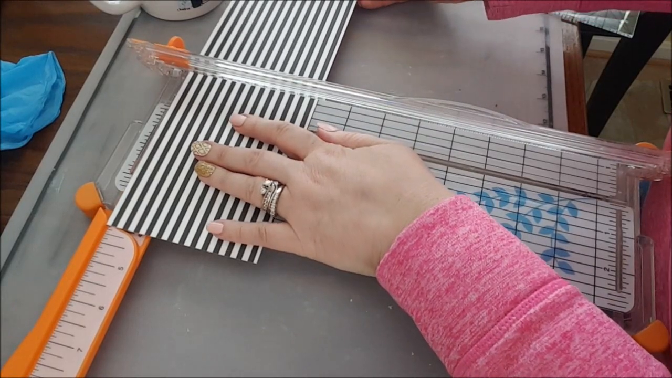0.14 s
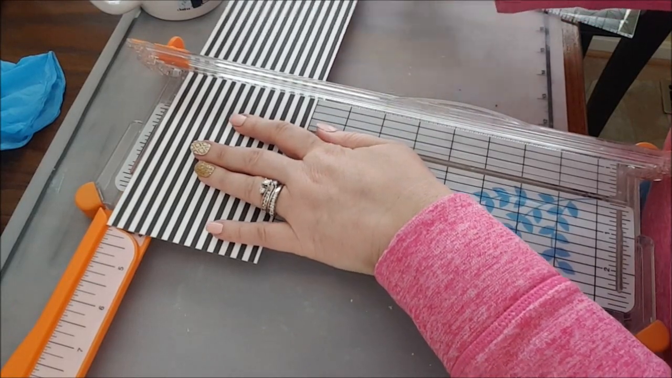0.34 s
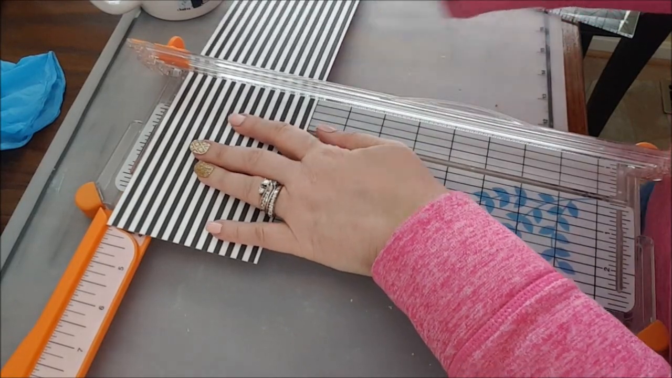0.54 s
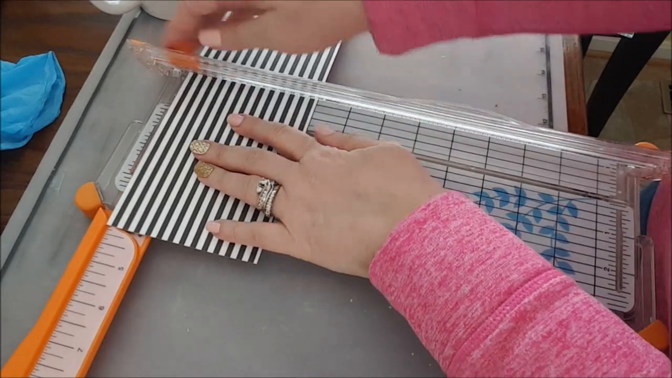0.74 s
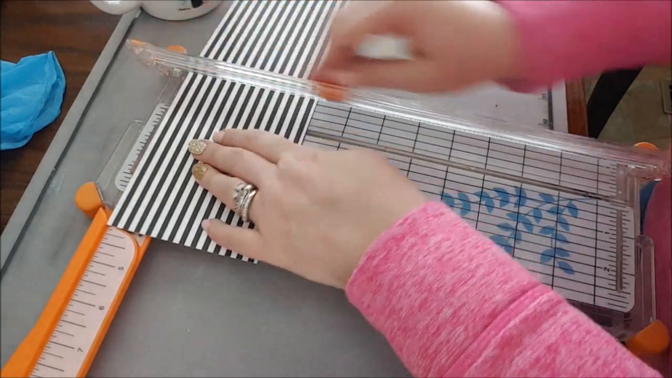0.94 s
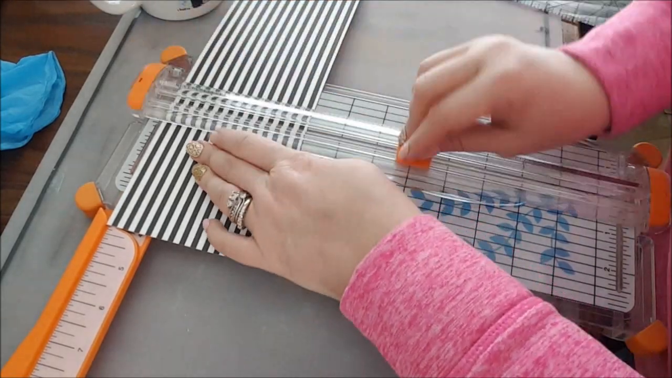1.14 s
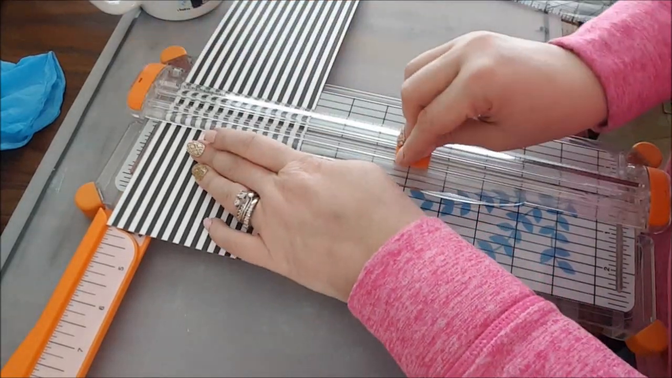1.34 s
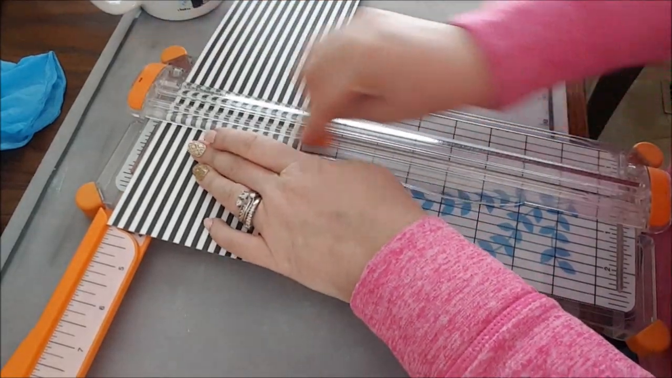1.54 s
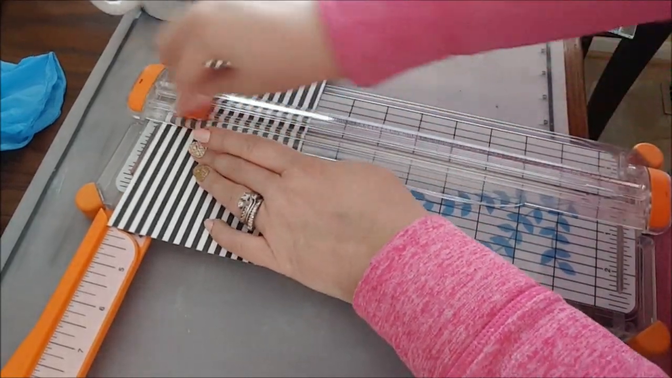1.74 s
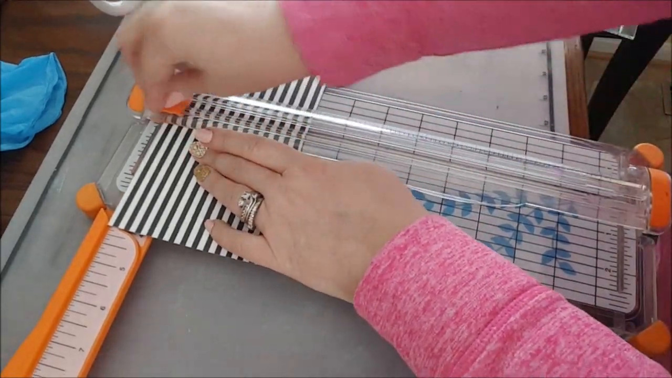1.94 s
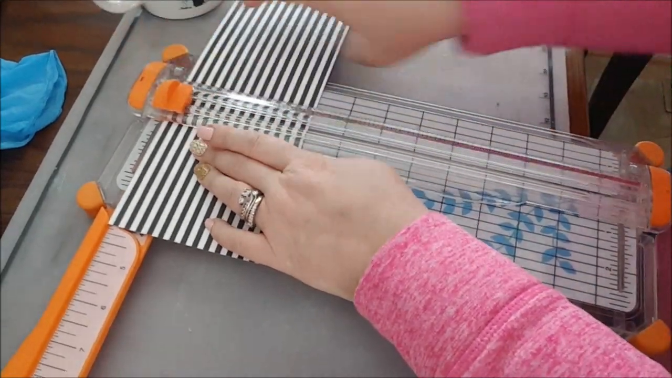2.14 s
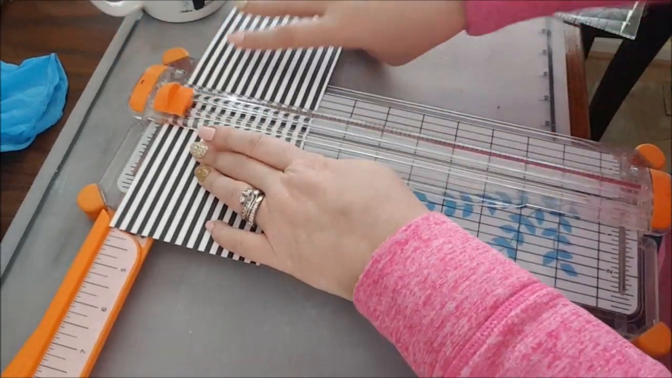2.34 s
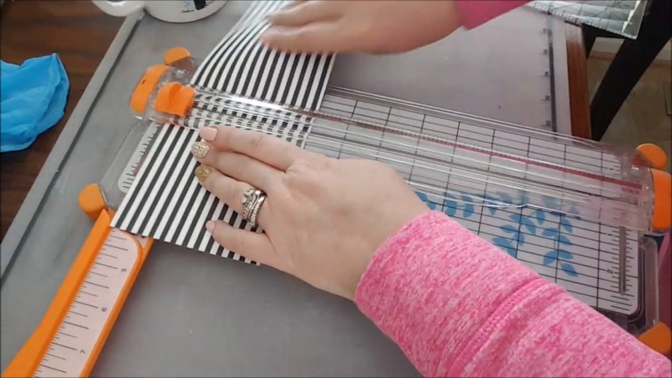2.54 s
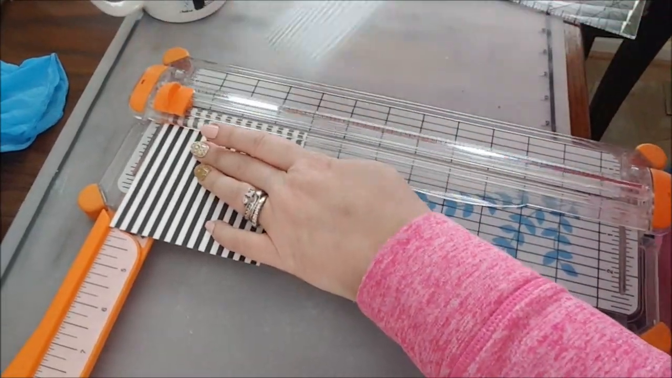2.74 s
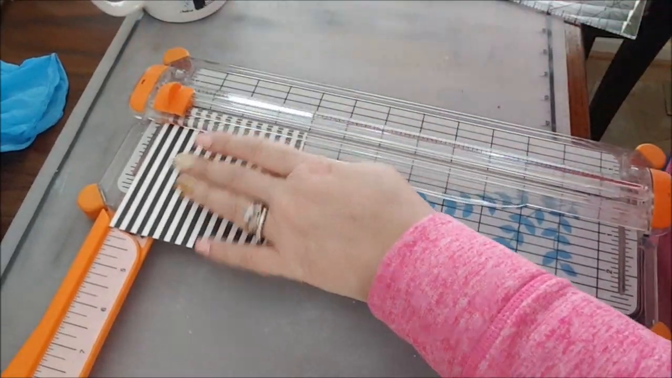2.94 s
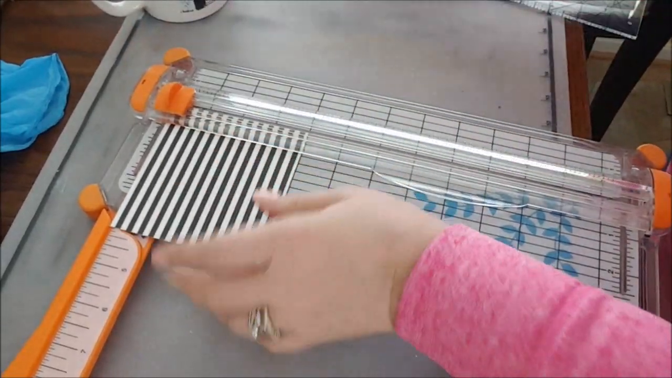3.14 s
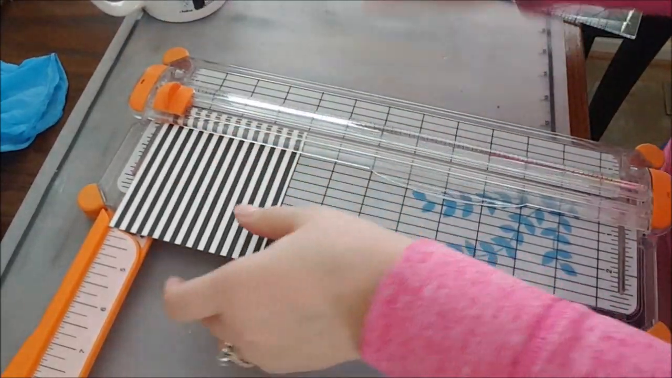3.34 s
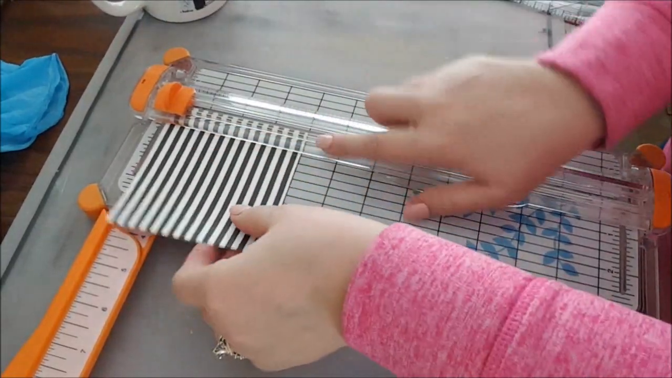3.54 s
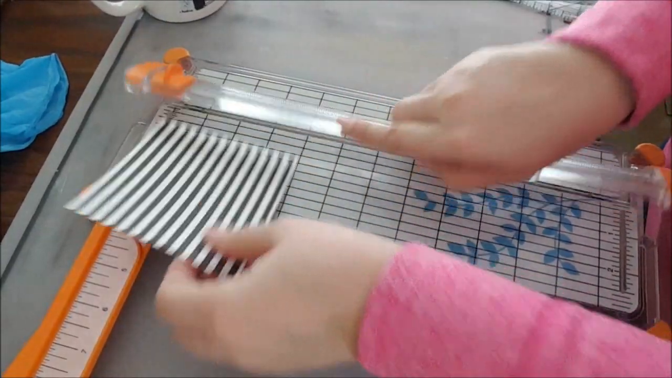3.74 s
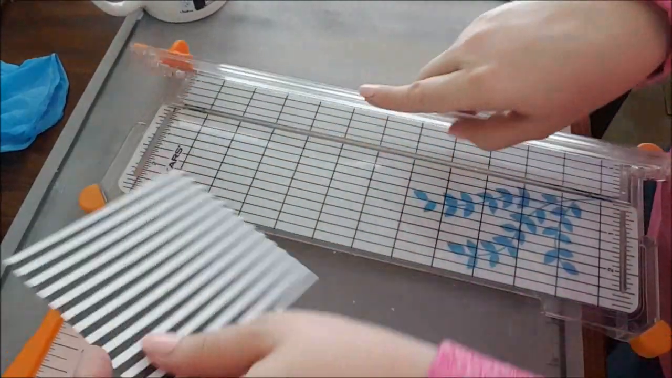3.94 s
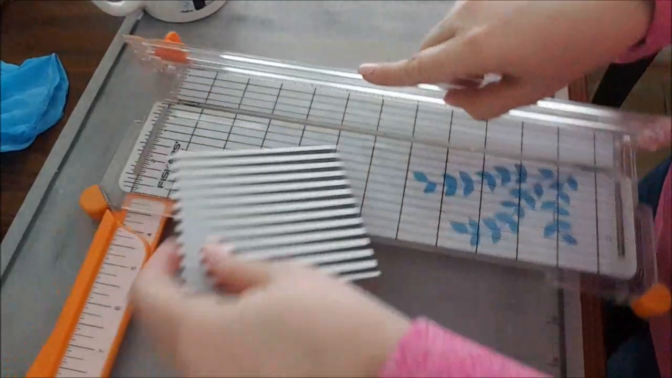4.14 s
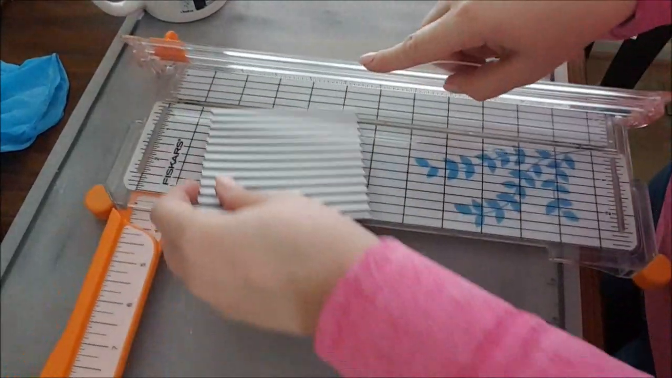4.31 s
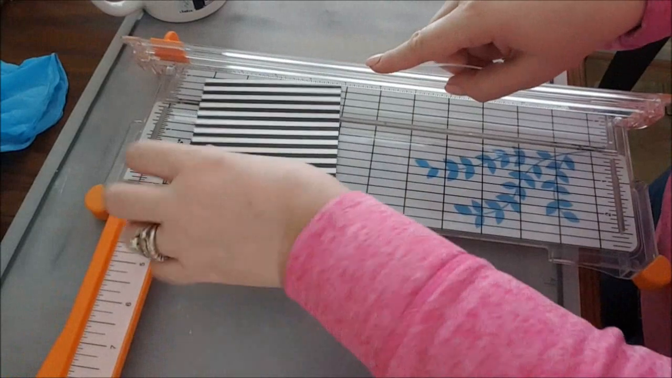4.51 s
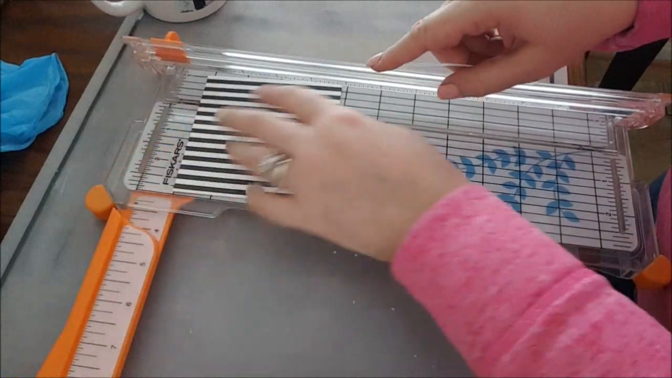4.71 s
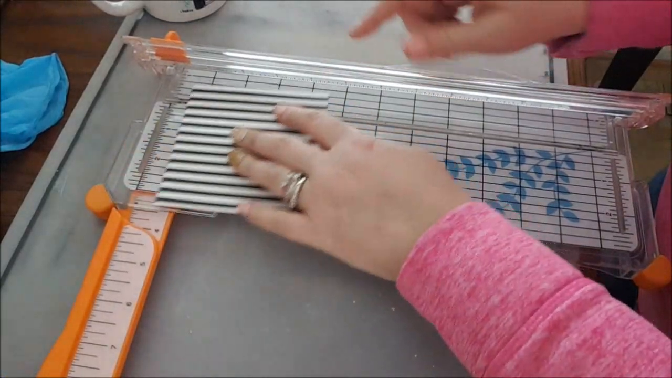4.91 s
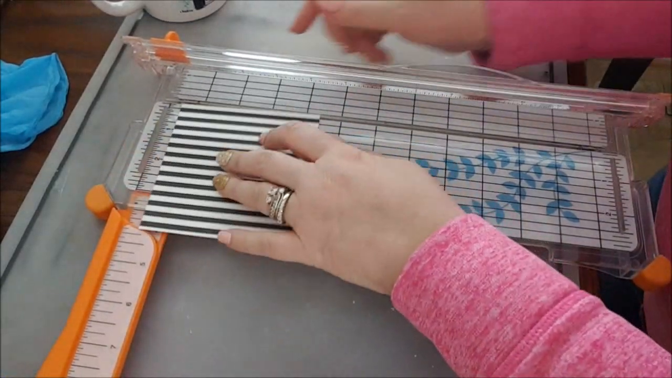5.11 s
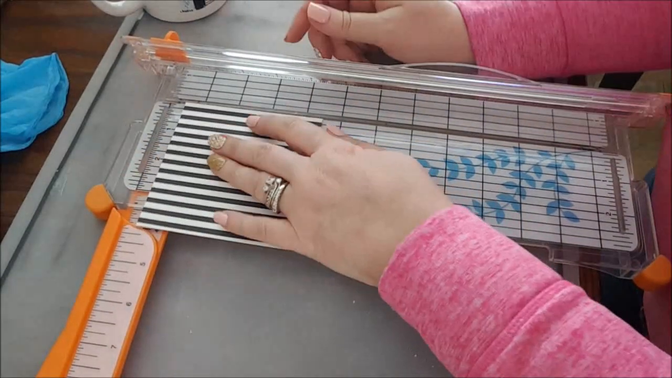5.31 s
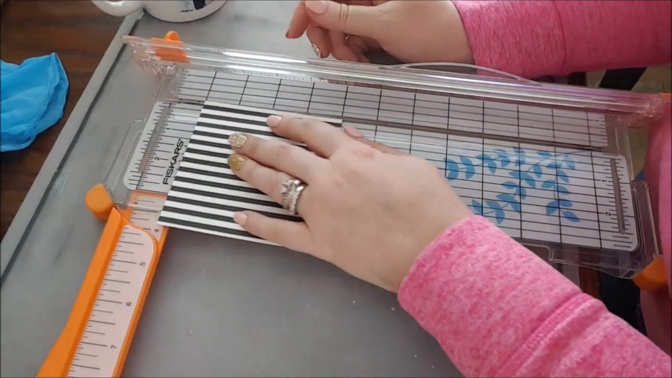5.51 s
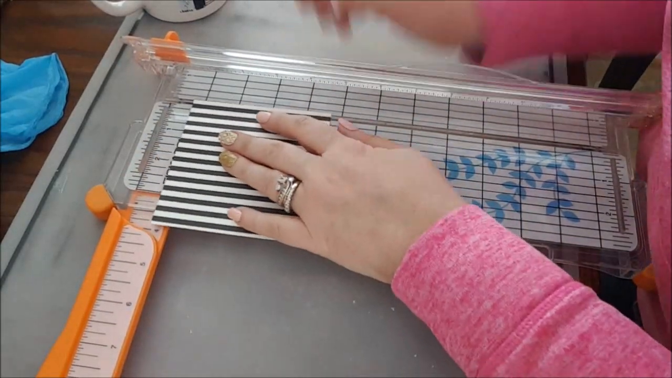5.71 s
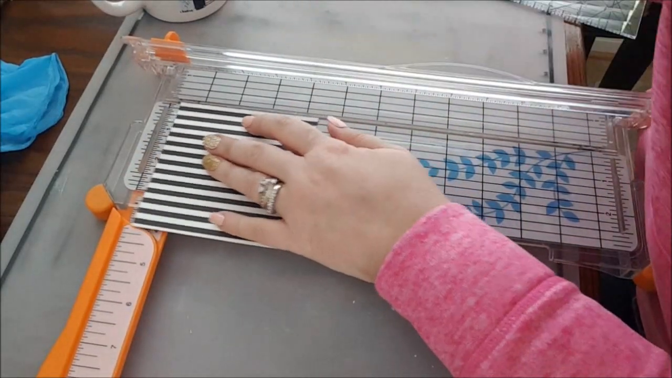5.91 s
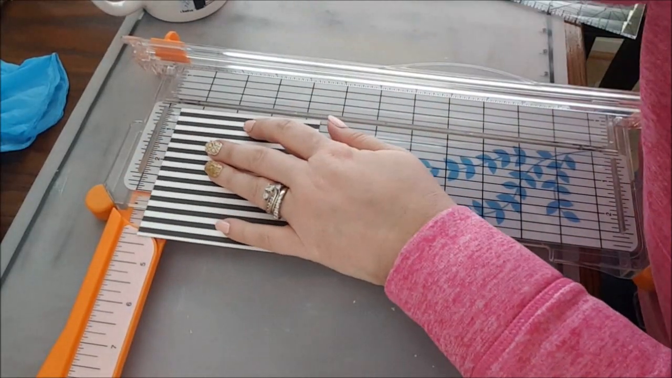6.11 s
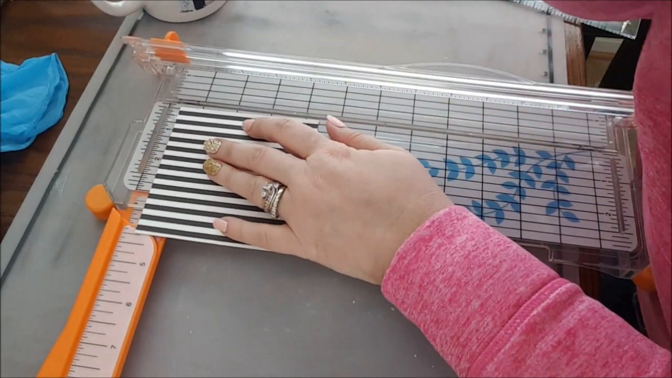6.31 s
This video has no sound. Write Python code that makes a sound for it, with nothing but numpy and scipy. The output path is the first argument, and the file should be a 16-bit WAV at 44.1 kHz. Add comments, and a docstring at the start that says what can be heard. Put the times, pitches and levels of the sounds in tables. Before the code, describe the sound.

Paper slides and rustles on a plastic trimmer, with sharp clacks, one quick blade cut and dull knocks on a table.

```python
"""In a small quiet room, hands shift paper and slide the blade of a plastic trimmer on a table.
Knocks make the hollow table and the plastic ring; rubbing paper scrapes through the same bodies.
The paper also hisses, scuffs and crinkles, and its fibres snap during one short cut.
Two spaced microphone openings hear the bass alike and the treble differently, over a low house rumble."""
import sys
import numpy as np
from scipy import signal
from scipy.fft import rfft, irfft, next_fast_len
from scipy.io import wavfile
from scipy.ndimage import uniform_filter1d

SR = 44100
rng = np.random.default_rng(int(sys.argv[2]) if len(sys.argv) > 2 else 0)


def store_pcm(level_fs):
    """Save levels as 16-bit WAV."""
    pcm = np.round(np.clip(level_fs, -1, 1) * 32767).astype(np.int16)
    wavfile.write(sys.argv[1], SR, np.atleast_2d(pcm).T)


N = 284886
ALIKE_HZ = 900  # left and right hear much the same below this

# the tones the hollow table rings with: f/Hz, level/dB, time to fade by 60 dB/s
TABLE_TONES = [(123.8, 0, 0.17), (172.7, -2, .14), (220.3, 5.5, 0.084), (260.1, -3.5, 0.11),
               (303, -5.5, 0.097)]
# the tones the plastic trimmer rings with: f/Hz, level/dB, time to fade by 60 dB/s
PLASTIC_TONES = [(362.2, -2, 0.043), (474, -4.5, 0.05), (639, -5.5, 0.051), (728, -5.5, 0.04),
                 (827, -7, 0.043), (899.6, -4, 0.052), (1005, -3.5, 0.049), (1172.4, -2, 0.032),
                 (1421, 1, 0.021), (1614, 2.5, 0.025), (2080, 5, 0.018), (3040, 1, 0.026),
                 (3770, -4.5, 0.042)]


def gain(db):
    """Turn decibels into a number to multiply a sound by."""
    return np.exp(np.asarray(db) * (np.log(10) / 20))


def unit(x):
    """Scale a sound to an average strength (rms) of 1."""
    return x / np.sqrt(np.mean(x ** 2))


def colour(x, points):
    """Shape a sound's bass and treble along (f/Hz, level/dB) points; it comes out at strength 1."""
    hz, db = np.transpose(points)
    size = next_fast_len(x.shape[-1])
    f = np.maximum(np.fft.rfftfreq(size, 1 / SR), 1)
    curve = gain(np.interp(np.log(f), np.log(hz), db, -120, -120))
    return unit(irfft(rfft(x, size) * curve, size)[:, :x.shape[-1]])


def stereo_noise(count):
    """Noise at both microphone openings: shared in the bass, slightly opposed in the treble."""
    size = next_fast_len(count)
    f = np.fft.rfftfreq(size, 1 / SR)
    alike = np.clip(1.136 / (1 + (f / ALIKE_HZ) ** 2) - .2, -1, .97)
    mid, side = rfft(rng.standard_normal((2, size)))
    mid, side = mid * np.sqrt(1 + alike), side * np.sqrt(1 - alike)
    return unit(irfft(np.array([mid + side, mid - side]), size)[:, :count])


def wander(per_second):
    """A curve that glides to a new random value this many times a second."""
    step = int(SR / per_second)
    return 1.69 * uniform_filter1d(np.repeat(rng.standard_normal(N // step + 1), step), step)[:N]


def band(x, hz, width_hz):
    """Keep the part of a sound near one pitch, at strength 1."""
    return unit(signal.lfilter(*signal.iirpeak(hz, hz / width_hz, fs=SR), x))


def house_rumble():
    """The house rumbles and hisses, wavering a little, beside a faint steady high whine."""
    # the background noise, from bass to treble: f/Hz, level/dB
    rumble_shape = [(15, -66), (25, -22.5), (55, -13), (126, -14), (179, -13.5), (200, -16.5), (299, -18.5),
                    (403, -26), (691, -25), (1090, -31.5), (1180, -31.5), (6660, -45.5), (15800, -45.5)]
    whine = band(rng.standard_normal((2, N)), hz=9700, width_hz=110)
    rumble = gain(-63.5 + 0.4 * wander(1)) * colour(stereo_noise(N), rumble_shape)
    return rumble + gain(-91) * whine


def shake_body(x, tones, damping):
    """Steady shaking makes a body hum; pressing hands (damping) blur its tones."""
    out = 0
    for hz, db, fade_s in tones:
        # as the point of contact travels, each tone comes and goes
        out = out + gain(db + 4.5 * wander(18)) * band(x, hz, damping / fade_s)
    return unit(out)


def rubbing_paper():
    """Paper sticks and slips very fast: the plastic scrapes, the sheet hisses, the table rumbles."""
    # rubs: t at full strength/s, rise/s, hold/s, fall/s, scrape level/dB,
    # hiss above the scrape/dB, rumble above the scrape/dB
    rubs = [(0.43, 0.2, 0.053, 0.069, -64, -7.5, -20), (1.096, 0.27, 0.05, 0.13, -60.5, -5.5, -10),
            (1.18, .04, 0.041, 0.38, -65.5, -1.5, -5), (1.722, 0.79, .005, 0.57, -56.5, -13, -1),
            (1.766, 0.0051, .25, 0.0033, -47, -2.5, 1.5), (2.806, 0.18, 0.028, 0.094, -48, -3.5, -19),
            (2.911, 0.29, 0.002, 0.0043, -44, 1, -24), (3.285, 0.053, .005, 0.15, -59.5, -6.5, 7.5),
            (3.361, 0.081, .005, 0.044, -51.5, -13.5, -9.5), (3.742, 0.012, .005, 0.12, -57, -4, -3),
            (3.927, 0.44, 0.059, 0.23, -67.5, -3.5, 1), (4.099, 0.3, .005, 0.097, -63, -2, -4.5),
            (4.242, 0.4, 0.078, 0.23, -67, -1.5, -20.5), (4.474, 0.021, 0.011, 0.06, -44.5, -39, -5.5),
            (4.665, 0.12, 0.038, 0.028, -65, 0, -15), (5.09, 0.16, 0.02, 0.14, -69.5, 8.5, 2.5),
            (5.278, 0.11, 0.0088, 0.068, -70.5, 1.5, -3), (6.1, 0.38, 0.029, 0.23, -73.5, -0.5, 4.5),
            (6.273, 0.37, 0.011, 0.16, -69, -6, -16.5)]
    # creases snapping in the paper: t/s, level/dB
    crinkles = [(3.365, -50), (3.462, -52), (3.6709, -49.5), (3.7024, -52), (3.7456, -65), (3.9055, -56),
                (4.463, -69), (4.4835, -50.5), (4.999, -54), (5.268, -56.5), (5.5031, -59)]
    # the scrape, from bass to treble: f/Hz, level/dB
    scrape_shape = [(200, -28), (400, -23.5), (1000, -8), (1180, -7), (1370, -9), (2100, -10), (2700, -9.5),
                    (3120, -11.5), (3600, -12), (6500, -38.5)]
    # the paper's bright hiss: f/Hz, level/dB
    hiss_shape = [(2200, -29.5), (3400, -1.5), (4500, -7.5), (6300, -5), (7400, -7.5), (8400, -1),
                  (9500, -9), (10600, -13), (12000, -15.5), (15900, -17.5)]
    swell_db, crinkle_s = 25, 0.0013  # a rub climbs by swell_db in its rise and sinks as far in its fall
    t = np.arange(N) / SR
    power = np.zeros((3, N))
    for start, rise, hold, fall, scrape_db, hiss_db, rumble_db in rubs:
        from_peak = np.maximum((start - t) / rise, (t - start - hold) / fall).clip(min=0)
        levels_db = scrape_db + np.array([[0], [hiss_db], [rumble_db]])
        power += gain(levels_db - swell_db * from_peak) ** 2
    scrape_gain, hiss_gain, rumble_gain = np.sqrt(power)
    for start, db in crinkles:  # the hiss jumps and dies at once
        hiss_gain += gain(db) * np.exp(-np.maximum(t - start, 0) / crinkle_s) * (t >= start)
    slips = gain(2.0 * wander(400) + .8 * wander(50))
    friction = stereo_noise(N) * slips
    scrape = unit(colour(friction, scrape_shape) + .6 * shake_body(friction, PLASTIC_TONES, damping=2.5))
    hiss = colour(stereo_noise(N) * slips, hiss_shape)
    rumble = shake_body(friction, TABLE_TONES, damping=9.7)
    return scrape_gain * scrape + hiss_gain * hiss + rumble_gain * rumble


def strike_body(tones, chance, t, centre_hz, drop_db_per_octave, scatter_db=2):
    """One blow rings a body; where it lands favours the tones near centre_hz."""
    hz, db, fade_s = np.transpose(tones)[:, :, None]
    share, detune, skew = chance[:, :len(tones), None]  # no two blows are alike
    db = db + scatter_db * share - drop_db_per_octave * np.abs(np.log2(hz / centre_hz))
    fading = gain(db - 60 * t / fade_s) / np.linalg.norm(gain(db))
    phase = 2 * np.pi * hz * (1 + 0.011 * detune) * t
    apart = (.5 + .2 * skew) * hz / ALIKE_HZ  # higher tones reach left and right more out of step
    return np.array([(fading * np.sin(phase + shift)).sum(0) for shift in (apart, -apart)])


def knocks():
    """Each knock gives a sharp tick and sets the plastic clacking and the table thudding."""
    # knocks: t/s, clack level/dB, clack f/Hz, thud level/dB, thud f/Hz, tick level/dB, tick f/Hz
    blows = [(0.586, -48, 1060, -65, 166, -60, 2410), (0.919, -28, 1450, -37.5, 264, -33.5, 4895),
             (0.94, -32, 1540, -39.5, 316, -51, 2400), (1.269, -44, 1399, -62, 200, -66, 2380),
             (1.3005, -7.5, 915, -12.5, 240, -6.5, 4106), (1.31, -11, 650, -44, 230, -12.5, 4170),
             (1.323, -12, 970, -40, 242, -11, 4850), (1.704, -31.5, 1130, -65, 250, -45, 2720),
             (1.767, -34.5, 750, -36, 233, -44, 3090), (2.017, -21, 1060, -23.5, 260, -21.5, 3720),
             (2.126, -40, 352, -35.5, 216.6, -71, 2450), (2.198, -38.5, 930, -73.5, 198, -77.5, 2400),
             (2.368, -27, 358, -36.5, 349, -45.5, 2330), (2.529, -66.5, 355, -44.5, 190, -79, 2400),
             (2.663, -46.5, 960, -52.5, 249, -60.5, 2400), (2.696, -32.5, 1110, -42.5, 129.5, -39, 2670),
             (2.916, -14, 920, -25, 235, -18, 3680), (2.934, -14, 960, -28, 226, -17, 1665),
             (3.281, -40.5, 904, -56.5, 269, -45, 4200), (3.297, -35.5, 863, -64, 273, -49, 2400),
             (3.335, -34, 443, -43, 232, -44.5, 2620), (3.347, -28, 847, -49.5, 326, -35.5, 2210),
             (3.403, -64.5, 925, -44.5, 118.3, -49, 2385), (3.656, -34, 354, -38, 347, -48, 2400),
             (3.669, -31.5, 1030, -45.5, 195, -48, 2400), (3.7, -38, 900, -62.5, 245, -47.5, 2400),
             (3.725, -30, 1003, -34, 187, -50.5, 2405), (3.852, -45.5, 1040, -43, 222, -52.5, 2400),
             (4.234, -42, 1540, -59.5, 215, -51.5, 3670), (4.324, -23.5, 470, -20.5, 220, -50, 3640),
             (4.36, -43, 1170, -32.5, 213, -49, 1950), (4.456, -24, 350, -9.5, 188, -41.5, 1170),
             (4.475, -32.5, 1160, -25.5, 154, -42.5, 1185), (4.485, -42, 1410, -24.5, 306, -45.5, 1980),
             (4.523, -32, 494, -21.5, 146, -47.5, 1874), (5.001, -49, 1040, -52, 261, -57, 2406),
             (5.361, -41, 1000, -50.5, 156, -48.5, 3600), (5.393, -48, 1007, -66, 153.6, -57.5, 3620),
             (5.42, -55, 1010, -45, 257, -61.5, 3600), (5.503, -51, 864, -43, 115.4, -58, 2400)]
    # the crack of noise on contact, from low to high: f/Hz, level/dB
    crack_shape = [(900, -35.5), (1700, 6.5), (9000, -1.5), (11000, -9), (16000, -12.5)]
    contact_s, thud_rise_s, clack_rise_cycles = 0.0031, .007, 1.4
    ping_db, ping_fade_s = -5, .035
    out, size, crack_size = np.zeros((2, N + SR)), 8192, 2048
    t = np.arange(size) / SR
    f = np.fft.rfftfreq(crack_size, 1 / SR) + 1
    push = np.exp(-t[:crack_size] / contact_s) * (1 - np.exp(-t[:crack_size] / (0.31 * contact_s)))
    thud_rise = np.sin(np.minimum(t / thud_rise_s, 1) * np.pi / 2) ** 2  # the table swings up slowly
    for start, clack_db, clack_hz, thud_db, thud_hz, tick_db, tick_hz in blows:
        chance = rng.standard_normal((2, 3, 16))
        clack = strike_body(PLASTIC_TONES, chance[0], t, clack_hz, drop_db_per_octave=13)
        clack *= np.minimum(t * clack_hz / clack_rise_cycles, 1)  # duller clacks come from softer contact
        thud = strike_body(TABLE_TONES, chance[1], t, thud_hz, drop_db_per_octave=8.5)
        thud *= thud_rise * np.linspace(1, 0, size)
        blow = gain(clack_db) * clack + gain(thud_db) * thud
        # the tick is a broad crack plus a ping from the small part that is struck
        near_tick = gain(-5 * np.abs(np.log2(f / tick_hz)))
        crack = irfft(rfft(colour(stereo_noise(crack_size), crack_shape)) * near_tick)
        blow[:, :crack_size] += gain(tick_db) * unit(crack) * push
        ping = strike_body([(tick_hz, 0, ping_fade_s)], chance[1], t, tick_hz, drop_db_per_octave=0)
        blow += gain(tick_db + ping_db) * ping * np.minimum(t / .001, 1)
        i = int(start * SR)
        out[:, i:i + size] += blow
    return out[:, :N]


def paper_scuffs():
    """A paper edge scuffs: a puff of noise with a pitch of its own that soon dies."""
    # scuffs: t/s, level/dB, f/Hz, dying time/ms
    scuffs = [(1.171, -50.5, 3440, 24), (2.79, -43.5, 4930, 60), (2.855, -42.5, 1790, 34),
              (2.877, -37.5, 1178, 31), (2.885, -37, 3050, 25), (3.95, -61.5, 10460, 10),
              (4.649, -55, 3150, 35), (6.16, -71, 14540, 11.6), (6.249, -65, 13950, 22),
              (6.361, -70.5, 13400, 23)]
    out, size = np.zeros((2, N + SR)), 8192
    t_ms = 1000 * np.arange(size) / SR
    for start, db, hz, dying_ms in scuffs:
        peak_shape = [(hz / 2, -36), (hz / 1.08, -11), (hz, 0), (hz * 0.96, -11), (hz * 2, -36)]
        puff = colour(stereo_noise(size), peak_shape)
        rise_and_fall = np.minimum(3 * t_ms / dying_ms, 1) * np.exp(-t_ms / dying_ms)
        i = int(start * SR)
        out[:, i:i + size] += gain(db) * puff * rise_and_fall
    return out[:, :N]


def blade_cut():
    """Fibres part in quick uneven snaps while the blade runs through the sheet."""
    # the pitches at which the blade sings in the paper: f/Hz, width/Hz, level/dB
    blade_bands = [(205, 47, 0.5), (720, 110, 7.5), (997, 70, 9), (1364, 82, 7.5), (2080, 94, -19),
                   (3050, 110, 5), (3440, 140, -13), (5170, 440, -5), (8600, 1600, -4)]
    start_s, length_s, level_db = 1.766, 0.248, -45
    out, size = np.zeros((2, N)), SR // 2
    t = np.arange(size) / SR
    snaps = stereo_noise(size) * gain(2.6 * wander(700)[:size] + .8 * wander(90)[:size])
    singing = sum(gain(db + 1.6 * wander(35)[:size]) * band(snaps, hz, width_hz)
                  for hz, width_hz, db in blade_bands)
    on_off = np.clip(np.minimum(t, length_s - t) / .003, 0, 1)
    i = int(start_s * SR)
    out[:, i:i + size] = gain(level_db) * unit(singing) * on_off
    return out


def room_echo(x):
    """The room smears each sound into a short echo whose low and high parts die at their own pace."""
    # the parts of the echo: f/Hz, time to fade by 60 dB/s, level/dB
    echo_bands = [(146.9, 0.34, -1), (503, 0.44, -5), (1540, 0.42, -5.5), (3750, 0.41, -7.5),
                  (9420, 0.3, -5.5)]
    size = SR // 2
    t, f = np.arange(size) / SR, np.fft.rfftfreq(size, 1 / SR)
    noise, tail = rfft(stereo_noise(size)), 0
    band_number = np.interp(np.log(f + 1), np.log([row[0] for row in echo_bands]), range(len(echo_bands)))
    for k, (_, fade_s, db) in enumerate(echo_bands):
        part = irfft(noise * np.clip(1 - abs(band_number - k), 0, 1), size)
        fade = gain(-60 * t / fade_s) * np.clip((t - .002) / .005, 0, 1)
        tail = tail + gain(db) * part * fade / np.linalg.norm(fade)
    return signal.fftconvolve(x, tail, axes=1)[:, :N]


def scene():
    """Add knocks, paper sounds, their echo and the house rumble, all leaning a little to the left."""
    left_lead_db, paper_echo_db = 1.2, -0.5  # rubbing close to the microphone stirs the room less
    hits = knocks()
    paper = rubbing_paper() + blade_cut() + paper_scuffs()
    echo = room_echo(hits + gain(paper_echo_db) * paper)
    balance = gain(np.array([[left_lead_db], [-left_lead_db]]) / 2)
    return (hits + paper + echo + house_rumble()) * balance


def record(dry):
    """The microphone thins the deep bass; the recorder cuts the highest treble."""
    bass_cut_hz, treble_cut_hz = 70, 15900
    thin = signal.sosfilt(signal.butter(2, bass_cut_hz, "high", fs=SR, output="sos"), dry)
    return signal.sosfilt(signal.ellip(10, .2, 80, treble_cut_hz, fs=SR, output="sos"), thin)


dry = scene()
out = record(dry)
store_pcm(out)
```